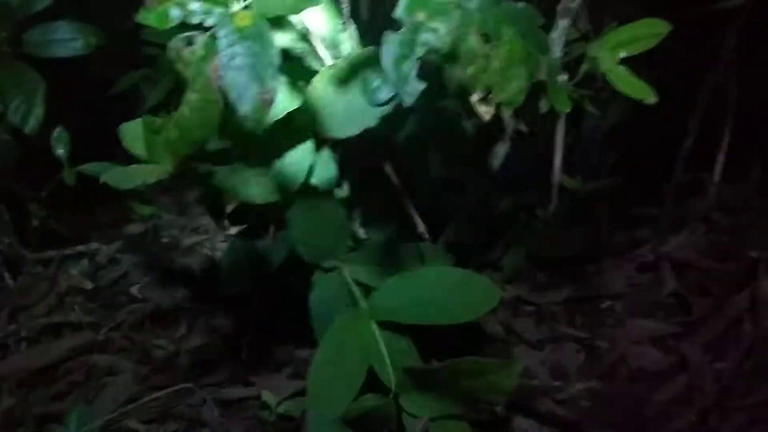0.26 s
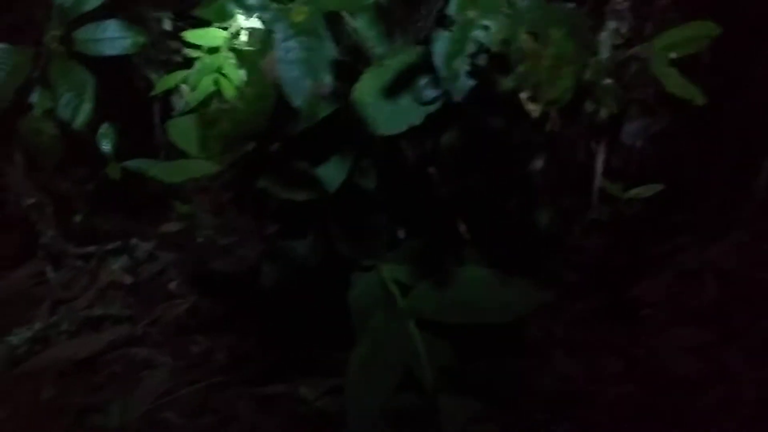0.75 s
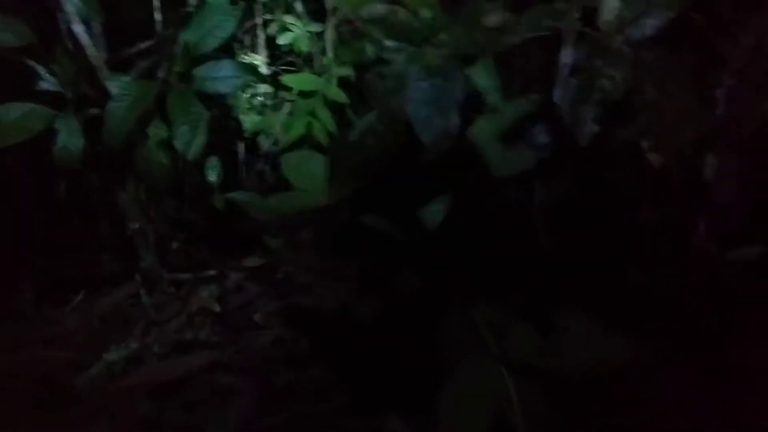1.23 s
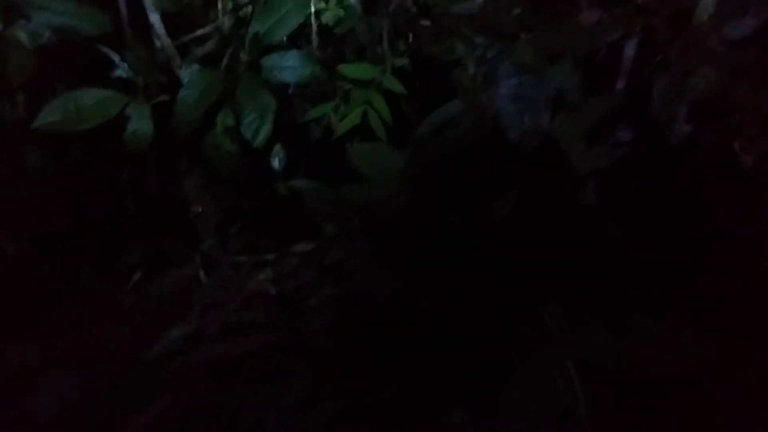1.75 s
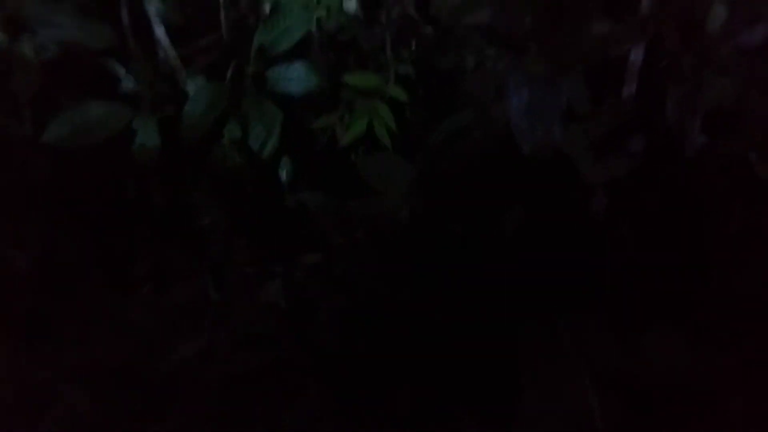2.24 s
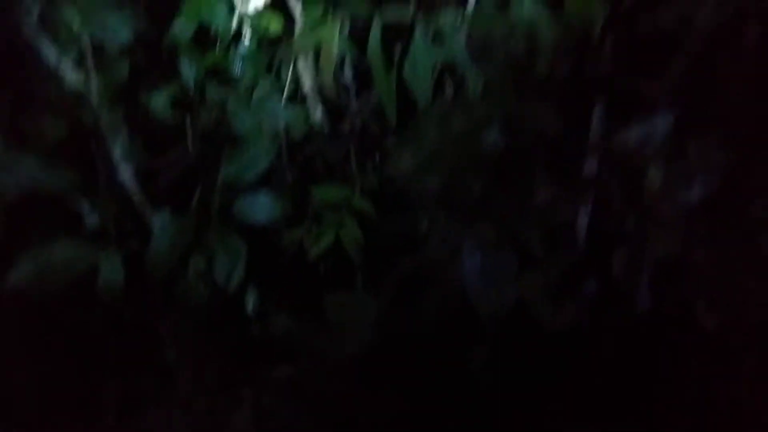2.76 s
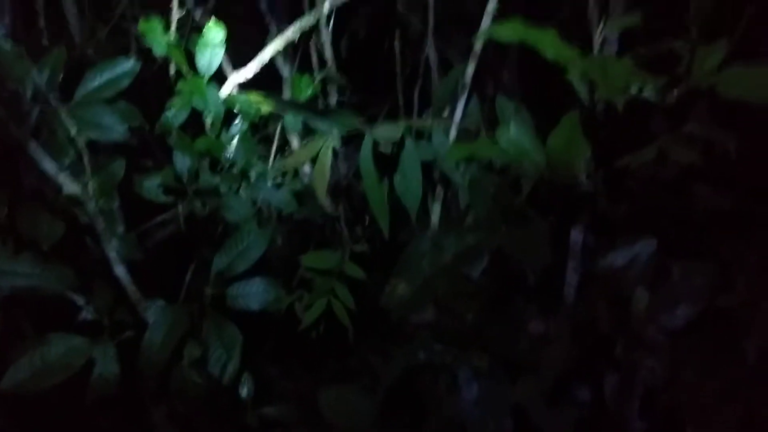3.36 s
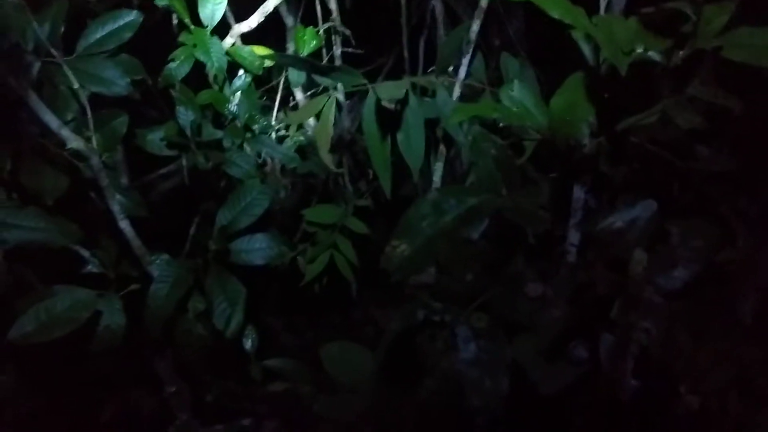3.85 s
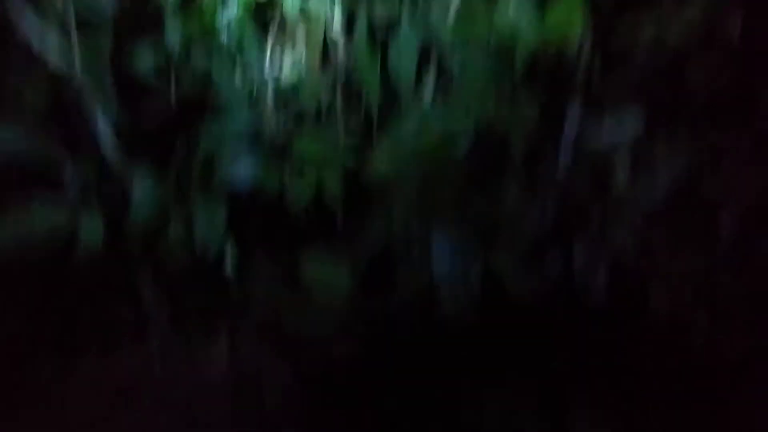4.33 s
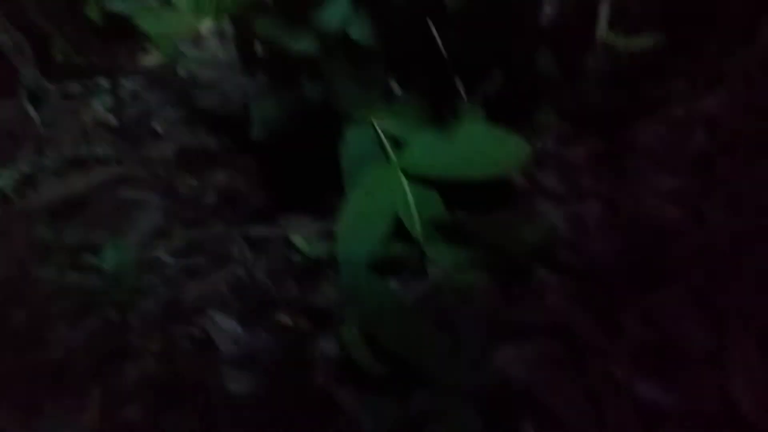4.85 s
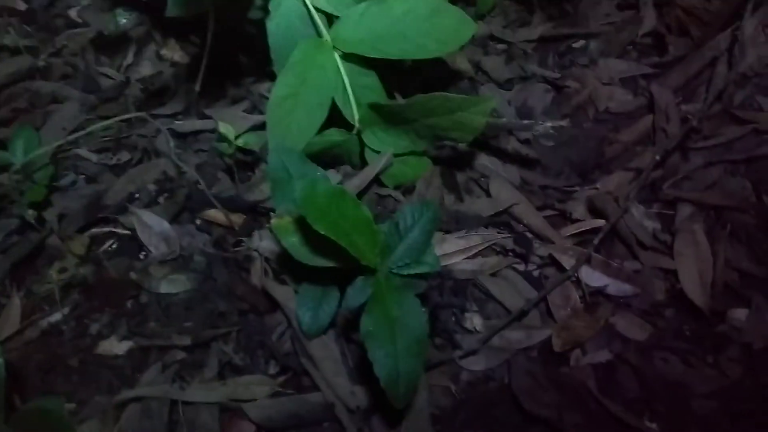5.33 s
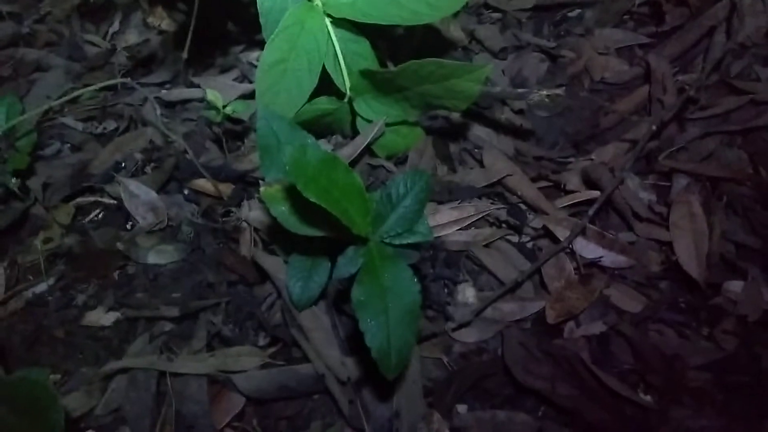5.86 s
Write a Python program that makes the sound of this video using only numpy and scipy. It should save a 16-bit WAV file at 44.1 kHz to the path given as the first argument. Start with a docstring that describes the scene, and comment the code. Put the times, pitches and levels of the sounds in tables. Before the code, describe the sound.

A close, wide handheld stereo pickup among night insects: a fast, buzzy cricket trill is constant, over a lower, slower cricket and distant chorus. A sharp, bright rasp comes early, then soft pulsed chirps; low rattling frog croaks repeat in the middle as leaves crackle, with one distinct tick. Two more rasps follow near the end. Hissing forest air, slight tree echo and quiet hand thumps surround it.

```python
"""A forest floor at night, heard through two close microphone ports in a moving hand.
Ground crickets trill without pause and tree crickets sing pulsed phrases: wing tones opened once a stroke.
A katydid rasps as file teeth ring its wing; a frog croaks in groups of pulses; far frogs murmur, and soft
gliding tones whoop, whistle thinly and drip. Leaves rustle and tick, thin high hisses swell and the forest
air hisses, all as noise. The hand rumbles and bumps through the case; the trees echo the singers."""
import sys
import numpy as np
from scipy import signal
from scipy.io import wavfile
from scipy.ndimage import uniform_filter1d, map_coordinates

SR = 44100
rng = np.random.default_rng(int(sys.argv[2]) if len(sys.argv) > 2 else 0)


def decibels_to_gain(level_db):
    """Convert a level in decibels to a linear amplitude gain (20 dB per decade)."""
    exponent = np.asarray(level_db, float) / 20
    return 10 ** exponent


def store_wav(level_fs):
    """Save 16-bit WAV to argv[1]."""
    pcm = np.round(np.clip(np.atleast_2d(level_fs), -1, 1) * 32767)
    wavfile.write(sys.argv[1], SR, pcm.T.astype(np.int16))


N = 268569
T = np.arange(N) / SR


def unit(x):
    """Bring a sound to rms 1."""
    return x / np.sqrt(np.mean(np.abs(x) ** 2) + 1e-20)


def along(points, hz):
    """Read (frequency [Hz], value) points on a log frequency axis."""
    f, value = np.transpose(points)
    return np.interp(np.log(hz + 1), np.log(f + 1), value)


def curve(rows):
    """Join (time, value) rows by straight lines, one value per sample."""
    times, values = np.transpose(rows)
    return np.interp(T, times, values)


def wobble(rate):
    """A smooth random curve, rate knots a second."""
    return map_coordinates(rng.standard_normal(int(N * rate / SR) + 4), [T * rate])


def widened(hz):
    """Left-right likeness alternates evenly with frequency, as from stereo widening; low sound stays alike."""
    depth, centre_hz, period_hz, steady_below_hz = .93, 1075, 2600, 800
    return depth * np.cos(2 * np.pi * (np.maximum(hz, steady_below_hz) - centre_hz) / period_hz)


def noise(gain, alike, patchy_db):
    """Stereo noise of a given colour and left-right likeness, in patches of random gain."""
    hz, _, z = signal.stft(rng.standard_normal((2, N)), SR, nperseg=1024)
    patches = uniform_filter1d(rng.standard_normal(z.shape[1:]), size=7, axis=0)
    patches = unit(uniform_filter1d(patches, size=5, axis=1))
    # The share of mid (common) and side (opposite) sound sets the likeness.
    turn = np.arccos(np.clip(alike(hz), -1, 1)) / 2
    colour = (gain(hz) * np.array([np.cos(turn), np.sin(turn)]))[..., None]
    mid, side = signal.istft(z * colour * decibels_to_gain(patchy_db * patches), nperseg=1024)[1][:, :N]
    return unit(np.array([mid + side, mid - side]))


def strokes(wing_hz, cycles, share, fall_hz, drift_hz, lean=1, edge=.49):
    """A wing tone opened once a stroke, its pitch falling inside each stroke (complex, rms 1)."""
    within = cycles % 1
    u = np.clip(within / np.clip(share, .1, 1), 0, 1)
    opening = np.abs(np.sin(np.pi * u ** lean)) ** edge
    hz = wing_hz + fall_hz * (.5 - within) + drift_hz * wobble(30)
    return unit(opening * np.exp(2j * np.pi * np.cumsum(hz) / SR))


def ports(z, lead, pan_db):
    """A tone at the two ports: half the left's phase lead [rad] and half its extra level on each."""
    left = z * decibels_to_gain(pan_db / 2) * np.exp(.5j * lead)
    right = z * decibels_to_gain(-pan_db / 2) * np.exp(-.5j * lead)
    return np.sqrt(2) * np.real([left, right])


def crowd(wing_hz, spread_hz, rate, fall_hz, drift_hz, lead, scatter, pan_db, count):
    """Many far singers, each on its own pitch, beat and bearing, blend into one sound (rms 1)."""
    out = 0
    for a, b, c in rng.standard_normal((count, 3)):
        cycles = rate * (1 + .04 * b) * T + c
        song = strokes(wing_hz + spread_hz * a, cycles, 0.597, fall_hz, drift_hz)
        out = out + decibels_to_gain(1.46 * wobble(3.99)) * ports(song, lead + scatter * c, pan_db)
    return unit(out)


def swishes(rows, low_hz, top_hz):
    """Crackly swells of hiss in one band, rising faster than they fall."""
    band = lambda f: 1 / np.sqrt((1 + (low_hz / (f + 1)) ** 12) * (1 + (f / top_hz) ** 12))
    swell = 0
    for s, fall, db in rows:
        drop = np.where(T < s, (s - T) / (0.52 * fall), (T - s) / fall)
        swell = swell + decibels_to_gain(db - 20 * drop)
    crackle = decibels_to_gain(3.6 * wobble(250))
    return swell * unit(crackle * noise(band, widened, patchy_db=2.5))


# The two nearest ground crickets: (wing pitch [Hz], strokes per second [1/s], relative level [dB])
NEAR_TRILLERS = [(4264, 114, 0), (4452, 105, -8)]
# Their strokes: (open share of a stroke, pitch fall [Hz], lean: over 1 swells slowly and stops short)
NEAR_STROKES = [(.67, 390, 1.8), (.6, 380, .75)]
# Which way they lie: (time [s], phase lead of the left port [rad])
NEAR_BEARING = [(0, 0.37), (1, 1.55), (3.2, 2.1), (4.3, -1.6), (4.7, -1.33), (6.09, -2.03)]
# Loudness of all the ground crickets: (time [s], level [dB])
GROUND_LEVEL = [(0, -57), (.3, -59.5), (.58, -46), (.85, -49), (1.45, -53), (1.8, -49), (2.1, -52),
                (3.0, -49.5), (3.55, -46.5), (4.35, -51.5), (4.8, -44), (5.15, -48.5), (5.5, -44),
                (6.09, -44.5)]


def ground_crickets():
    """Wings scraped at a steady, rapid beat: two near trills over a crowd of far ones."""
    lead = curve(NEAR_BEARING)
    trills = decibels_to_gain(-1.5) * crowd(4340, 150, 110, 300, 24.83, 0.9, scatter=0.79, pan_db=-2.5, count=6)
    for (hz, rate, db), (share, fall_hz, lean) in zip(NEAR_TRILLERS, NEAR_STROKES):
        cycles = rate * T + .04 * wobble(2)
        wing = strokes(hz, cycles, share, fall_hz, 6, lean)
        trills = trills + decibels_to_gain(db + .8 * wobble(8)) * ports(wing, lead, -6.0)
    return decibels_to_gain(curve(GROUND_LEVEL)) * unit(trills)


# Loudness of the low-pitched crickets: (time [s], level [dB])
LOW_LEVEL = [(0, -65.5), (.5, -62), (3.6, -62.5), (3.85, -60), (4.39, -68), (4.66, -62), (4.92, -72),
             (5.15, -64), (6.09, -61.5)]


def low_crickets():
    """Slower strokes on a lower wing tone: one singer over three more."""
    wing = strokes(2970, 37.55 * T + 0.73, 0.75, fall_hz=80, drift_hz=10)
    one = ports(wing, 1.9, -6.2) * decibels_to_gain(1.7 * wobble(9))
    more = crowd(2970, 18, 48, 65, 15, 0.96, scatter=1.43, pan_db=3, count=3)
    return decibels_to_gain(curve(LOW_LEVEL)) * unit(one + decibels_to_gain(-3.5) * more)


# Tree cricket phrases: (first pulse [s], end [s], wing pitch [Hz],
# level before softening and tiring [dB], octave relative to the tone, less when soft [dB])
TREE_PHRASES = [(0.382, 0.63, 5030, -55, -32), (0.58, 1.077, 5060, -54, -45),
                (1.508, 1.995, 5075, -54, -19), (2.56, 3.0, 5095, -58, -33), (3.1, 3.83, 5115, -56, -27),
                (3.314, 3.68, 5290, -45.5, -16), (4.59, 5.09, 5290, -50, -15), (4.72, 5.12, 4970, -56, -36),
                (5.2, 5.75, 5090, -53, -30)]


def tree_crickets():
    """Each phrase swells in as the wing climbs to its pitch, carries a weak octave, then tires."""
    slack_hz, start_share, warm_s = 4960, .45, .19  # starts this share of the way from slack to full pitch
    soft_db, tire_db_per_s = 13, 8
    pulses_per_s, open_share = 28.9, .62
    out = np.zeros((2, N))
    for s, end, hz, db, octave_db in TREE_PHRASES:
        cold = np.clip(1 - (T - s) / warm_s, 0, 1)
        climb_hz = hz - (1 - start_share) * (hz - slack_hz) * cold
        cycles = pulses_per_s * (T - s) + open_share / 2
        wing = strokes(climb_hz, cycles, open_share, fall_hz=150, drift_hz=8.16, edge=.9)
        tired_db = tire_db_per_s * np.clip(T - s - warm_s, 0, 1)
        force_db = db - soft_db * cold - tired_db + wobble(20)
        gate = np.interp(T, [s - .02, s - .01, end - .01, end + .01], [0, 1, 1, 0])
        tone = ports(wing, -1.12, -0.09)
        octave = decibels_to_gain(octave_db - soft_db * cold / 2) * ports(wing ** 2, -1.63, -6.0)  # squaring doubles pitch
        out = out + decibels_to_gain(force_db) * gate * (tone + octave)
    return out


def tree_chorus(night_db):
    """Many far tree crickets blur into one chorus that follows the night level."""
    far = crowd(5100, 75, 30, 100, 22, -0.48, scatter=0.27, pan_db=-1.0, count=8)
    return decibels_to_gain(night_db + 6.5) * far


def all_tree_crickets(night_db):
    """Phrases and chorus together reach the left port a little late."""
    left, right = tree_crickets() + tree_chorus(night_db)
    return np.array([np.roll(left, 13), right])  # lag in samples


# Katydid rasps: (start [s], swell [s], length [s], level before swell and fade [dB], wing pitch at first [Hz])
KATYDID_RASPS = [(0.28, 0.039, 0.087, -34.5, 6900), (4.446, 0.0026, 0.093, -34.5, 7000),
                 (5.348, 0.035, 0.076, -35, 7050)]


def katydid():
    """File teeth each ring the wing briefly: nearly in step at first, a clear tone, then ever more unevenly."""
    sag_hz, spread_hz, clear_s = 300, 520, .045  # the tone sags and scatters as it goes
    teeth, teeth_per_s, pan_db = 200, 900, -3
    out, t = np.zeros((2, N + 512)), np.arange(512) / SR
    ring = decibels_to_gain(-60 * t / .024) * (1 - np.exp(-t / .0005))
    for s, swell, length, db, wing_hz in KATYDID_RASPS:
        draw = rng.standard_normal((teeth, 6))
        # When each tooth strikes, on whole samples after the start.
        late = np.round(np.abs(np.arange(teeth) + draw[:, 0])[:, None] / teeth_per_s * SR) / SR
        u = np.minimum(late / length, 1)
        rough = np.minimum(late / clear_s, 1) ** 2
        hz = wing_hz - sag_hz * u ** 2 + (200 + spread_hz * rough) * np.tanh(draw[:, 1:2] / 2)
        # Phase at the strike: the sagging pitch summed so far, plus growing scatter.
        start = 2 * np.pi * (wing_hz * late - sag_hz * length * u ** 3 / 3)
        start = start + (.5 + 3 * rough) * draw[:, 5:]
        fade_db = 5 * u + 25 * (late / length - u)
        force_db = db - 5 * np.clip(1 - late / swell, 0, 1) - fade_db + 3 * draw[:, 2:3]
        overtone = decibels_to_gain(-15.5) * np.minimum(1.5 * u, 1)
        where = (round(s * SR) + np.round(late * SR).astype(int) + np.arange(512)).ravel()
        for ear, sign in enumerate((.5, -.5)):
            turn = 2 * np.pi * hz * t + start + sign * (draw[:, 3:4] * 0.7 - 1.1)
            tone = np.sin(turn) + overtone * np.sin(1.89 * turn + 3 * draw[:, 4:5])
            tooth = decibels_to_gain(force_db + sign * pan_db) * ring * tone
            out[ear] += np.bincount(where, tooth.ravel(), N + 512)
    return out[:, :N]


# Frog croaks: (time [s], level [dB])
FROG_CROAKS = [(2.192, -54.5), (2.543, -54), (2.898, -50.5), (3.268, -49), (3.637, -51), (4.004, -50.5)]
# Pulses of each croak: (delay [s], relative level [dB], extra level of the upper modes [dB])
CROAK_PULSES = [(.002, 0, -2), (.0338, .5, 2), (.065, -1.5, 1), (.096, -7.5, 2.5), (.126, -14, 5)]
# Upper modes of the vocal sac: (pitch [Hz], relative level [dB], time to fall 60 dB [s])
SAC_MODES = [(665, 0, 0.04), (784, -4.5, 0.076), (930, -7.5, 0.051), (1215, -9, 0.088), (1500, -14, 0.042)]


def frog():
    """Each pulse swells the vocal sac on a falling pitch; the upper modes start first."""
    out, t = np.zeros(N + SR, complex), np.arange(SR // 8) / SR
    for s, db in FROG_CROAKS:
        for delay, pulse_db, upper_db in CROAK_PULSES:
            cycles = (510 - 170 * delay) * t - 500 * t ** 2
            body = (t / .009) * np.exp(1 - t / .009 - (t / .026) ** 4 + 2j * np.pi * cycles)
            upper = 0
            for f, level, t60 in SAC_MODES:
                decay = decibels_to_gain(upper_db + level + rng.normal(0, 3) - 60 * t / t60)
                upper = upper + decay * np.exp(2j * np.pi * (f * t + rng.random()))
            upper = upper * (1 - np.exp(-t / 0.001))
            first = round((s + delay - .006) * SR)
            out[first:][:len(t)] += decibels_to_gain(db + pulse_db) * (body + upper)
    return ports(out[:N], -.45, .3)


def frog_murmur(night_db):
    """Far frogs pulse slowly on low tones, blurred together and following the night level."""
    frogs = crowd(645, 45, 5.5, 124.5, 45, -.1, scatter=0.4, pan_db=4.2, count=6)
    return decibels_to_gain(night_db - 10) * unit(frogs * decibels_to_gain(1.8 * wobble(60)))


# Soft gliding tones, two rising whoops, two thin notes and a drip:
# (start [s], length [s], start pitch [Hz], end pitch [Hz], level [dB])
SOFT_TONES = [(.2, 0.155, 1330, 2030, -70), (1.7, .2, 990, 2050, -71.5), (1.113, .16, 2670, 2700, -71.5),
              (3.025, .025, 1200, 1060, -62), (4.798, 0.078, 2590, 2660, -67)]


def soft_tones():
    """Each tone swells and sinks once on a sliding pitch, roughened by random flutter."""
    out = 0
    for s, length, hz, end_hz, db in SOFT_TONES:
        u = np.clip((T - s) / length, 0, 1)
        loudness = decibels_to_gain(db + 1.4 * wobble(65)) * np.sin(np.pi * u) ** 0.3
        glide_hz = hz + (end_hz - hz) * u + 18 * wobble(60)
        out = out + loudness * np.exp(2j * np.pi * np.cumsum(glide_hz) / SR)
    return ports(out, -0.77, .5)


# Brushed leaves: (peak time [s], time to fall 20 dB [s], level [dB])
LEAF_BRUSHES = [(2.965, .14, -48), (3.12, .041, -52)]
# Band of the brushed leaves: (lowest [Hz], highest [Hz])
LEAF_BRUSH_BAND = (1300, 6500)
# Thin high hiss bursts, perhaps a far katydid: (peak time [s], time to fall 20 dB [s], level [dB])
HIGH_WISPS = [(1.58, .075, -56), (2.8, .15, -63), (2.94, .13, -49), (3.7, .041, -53), (5.8, .093, -61)]
# Band of the thin hiss bursts: (lowest [Hz], highest [Hz])
HIGH_WISP_BAND = (10500, 13200)
# Single leaf ticks: (time [s], level [dB])
LEAF_TICKS = [(1.053, -55), (1.155, -56), (1.301, -52), (1.5299, -50), (1.6487, -48), (2.7916, -50),
              (2.923, -44), (2.966, -47), (2.99, -45), (3.0265, -36), (3.107, -48), (3.1193, -43),
              (3.157, -50), (3.221, -50), (3.2618, -45)]


def leaves_and_wisps():
    """Brushed leaves swell as noise and single leaves tick as bright bursts; apart from them, high hiss swells."""
    out = swishes(LEAF_BRUSHES, *LEAF_BRUSH_BAND) + swishes(HIGH_WISPS, *HIGH_WISP_BAND)
    t = np.arange(400) / SR
    for s, db in LEAF_TICKS:
        grit = rng.standard_normal((2, len(t) + 1))
        bright = grit[:, 1:] - .5 * grit[:, :-1]
        out[:, round(s * SR):][:, :len(t)] += decibels_to_gain(db) * bright * decibels_to_gain(-60 * t / 0.012)
    return out * decibels_to_gain([[-1.5], [1.5]])


# Shaking of the hand: (time [s], level [dB])
HAND_LEVEL = [(0, -61.5), (.5, -60), (1.2, -57.5), (2.3, -63.5), (3.2, -57), (4.2, -62), (4.7, -56.5),
              (5.3, -59), (6.09, -56.5)]
# Colour of the rumble: (frequency [Hz], relative level [dB])
RUMBLE_COLOUR = [(20, -50), (40, -20), (60, -1), (110, -5.5), (200, -6), (350, -15), (600, -21.5),
                 (1200, -37.5)]
# Grip shifts: (time [s], level [dB])
GRIP_BUMPS = [(0.526, -41), (1.068, -40), (3.58, -46), (4.358, -45), (4.679, -42)]


def hand():
    """The case shakes the two ports in nearly opposite directions; grip shifts add dying low thumps."""
    rumble = noise(lambda f: decibels_to_gain(along(RUMBLE_COLOUR, f)), lambda f: 0 * f - .93, patchy_db=2.04)
    tremor = decibels_to_gain(1.1 * wobble(14))
    out = decibels_to_gain(curve(HAND_LEVEL)) * unit(tremor * rumble)
    for s, db in GRIP_BUMPS:
        cycles = np.clip(T - s, 0, 1) * 140
        thump = np.sin(2 * np.pi * cycles) * np.exp(-cycles / 1.5)
        out = out + decibels_to_gain(db) * np.array([[1], [-.5]]) * thump
    return out


# Colour of the far forest: (frequency [Hz], relative level [dB])
FOREST_COLOUR = [(60, -62), (200, -6), (500, -2.5), (1000, -5.5), (1900, -4.5), (2400, -4.5), (3300, -12),
                 (4000, 2), (5600, -26), (8000, -77)]


def forest_air(night_db):
    """Far forest noise, coloured and spread wide between the ports, follows the night level."""
    return decibels_to_gain(night_db) * noise(lambda f: decibels_to_gain(along(FOREST_COLOUR, f)), widened, patchy_db=2.5)


# Colour of the far insects: (frequency [Hz], relative level [dB])
INSECT_COLOUR = [(3000, -18), (5800, -4), (7500, -7), (8800, 0), (9500, -7), (11500, -5), (13600, 0),
                 (14050, 1), (14500, -40)]


def insect_hiss(night_db):
    """Distant insects blend into hiss, late and largely upside down at the left port."""
    hiss = noise(lambda f: decibels_to_gain(along(INSECT_COLOUR, f)), lambda f: 0 * f - .75, patchy_db=2.8)
    left, right = decibels_to_gain([[-2.2], [2.2]]) * hiss
    return decibels_to_gain(night_db - 6.5) * np.array([np.roll(left, 17), right])  # lag in samples


# The trees' answer: (frequency [Hz], time to fall 60 dB [s])
TREE_ECHO = [(300, 0.2), (2000, 0.27), (7000, 0.51), (14000, 0.16)]


def trees(x, tail_db):
    """The trees scatter echoes: a new tail for each port and each third of a second."""
    step, out = SR // 3, np.zeros((2, N + 2 * SR))
    for i in range(0, N, step):
        hz, t, z = signal.stft(rng.standard_normal((2, SR // 2)), SR, nperseg=256)
        decay = decibels_to_gain(-60 * t / along(TREE_ECHO, hz)[:, None])
        tail = signal.istft(z * decay, SR, nperseg=256)[1]
        wet = signal.fftconvolve(x[:, i:i + step], tail / np.linalg.norm(tail[0]), axes=1)
        out[:, i + 300:][:, :wet.shape[1]] += wet  # echoes begin 300 samples late
    return x + decibels_to_gain(tail_db) * out[:, :N]


# The far forest, swelling and sinking as one: (time [s], level [dB])
NIGHT_LEVEL = [(0, -65.5), (.3, -63), (.65, -59), (1.4, -61), (2.3, -62.5), (3.1, -56.5), (3.6, -58),
               (4.3, -63), (4.75, -58.5), (5.15, -60.5), (5.65, -58), (6.09, -59)]


def scene():
    """Singers and soft tones echo among the trees, over leaves, hisses, air and hand."""
    night_db = curve(NIGHT_LEVEL)
    near = trees(all_tree_crickets(night_db), -14) + trees(katydid(), -8) + trees(frog(), -9)
    floor = ground_crickets() + low_crickets() + frog_murmur(night_db) + soft_tones()
    background = leaves_and_wisps() + forest_air(night_db) + insect_hiss(night_db) + hand()
    return near + trees(floor, -7) + background


def top_cut(x):
    """Nothing passes above the cut-off."""
    return signal.sosfilt(signal.butter(12, 14940, fs=SR, output="sos"), x)


def record(dry):
    """The microphones fade out steeply in the top octave."""
    kept = signal.sosfilt(signal.butter(14, 13900, fs=SR, output="sos"), dry)
    return top_cut(kept)


dry = scene()
out = record(dry)
store_wav(out)
```